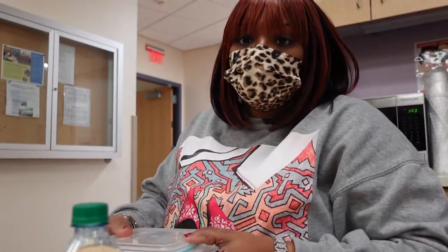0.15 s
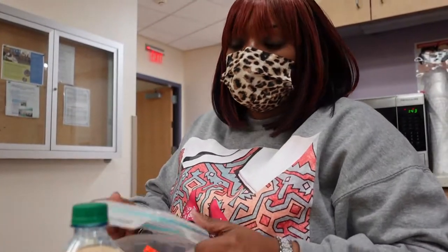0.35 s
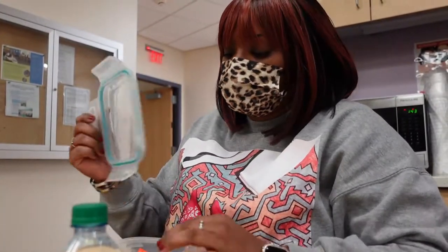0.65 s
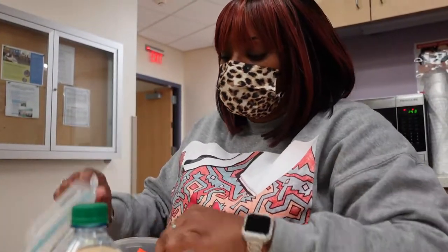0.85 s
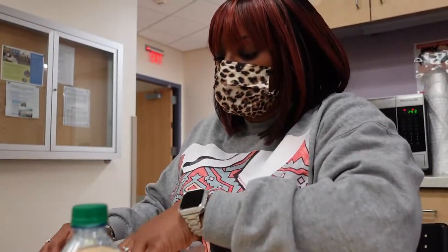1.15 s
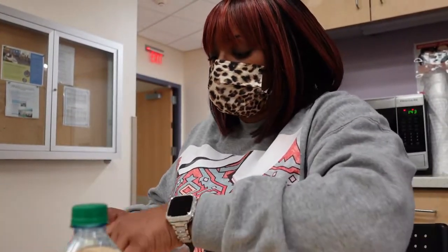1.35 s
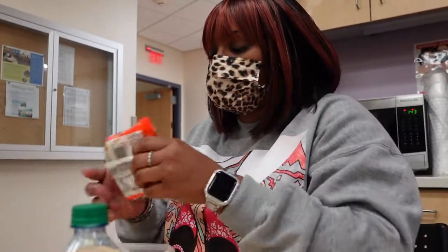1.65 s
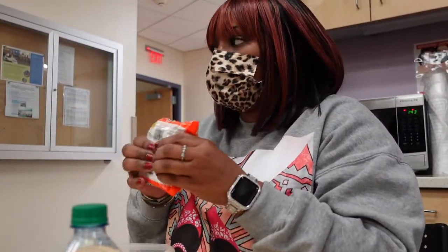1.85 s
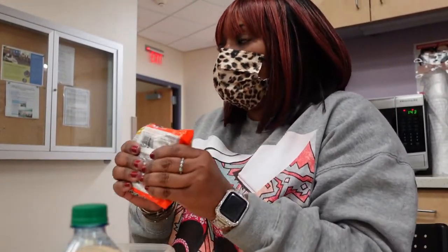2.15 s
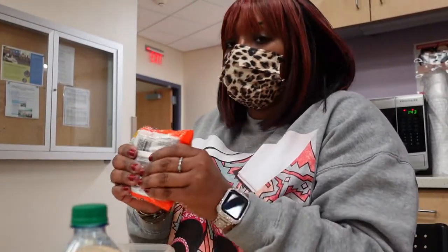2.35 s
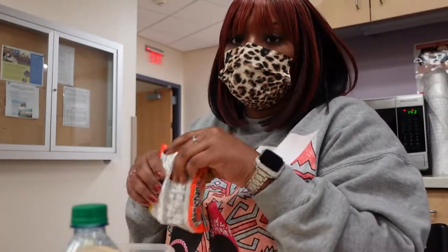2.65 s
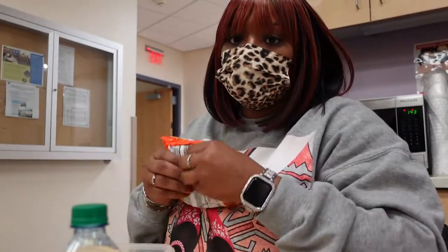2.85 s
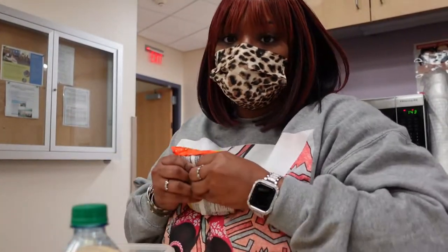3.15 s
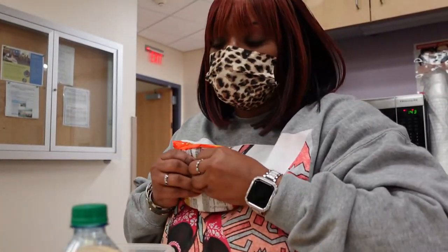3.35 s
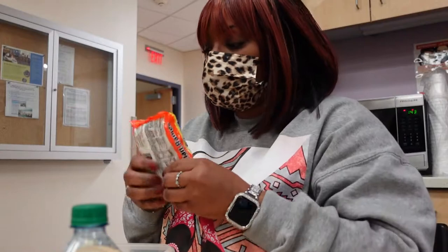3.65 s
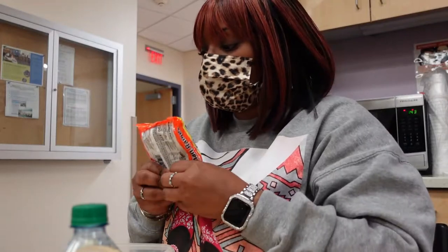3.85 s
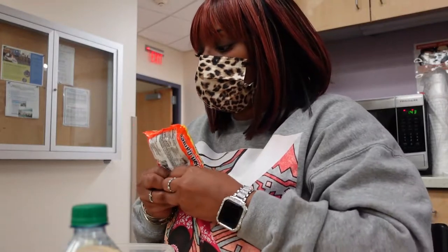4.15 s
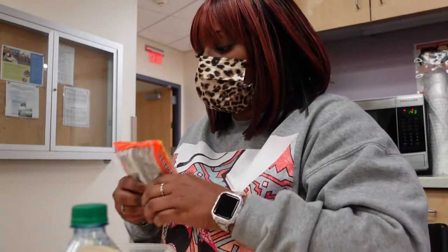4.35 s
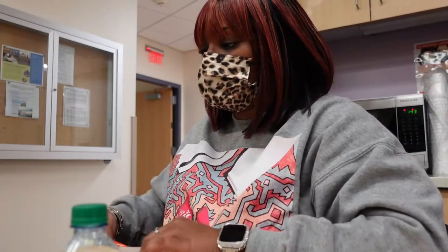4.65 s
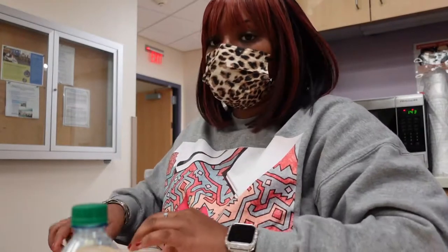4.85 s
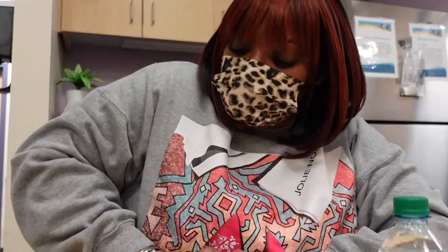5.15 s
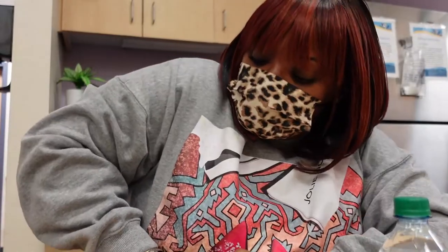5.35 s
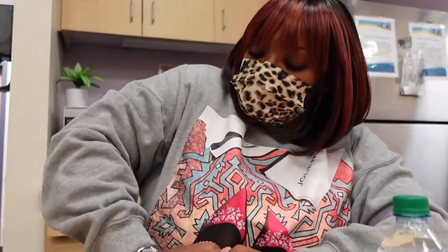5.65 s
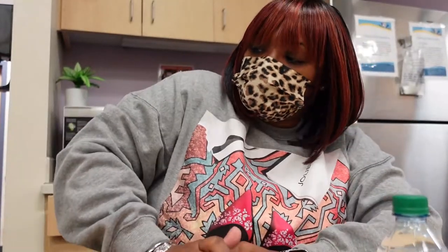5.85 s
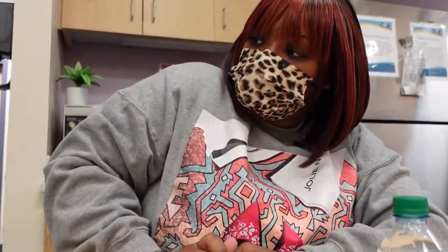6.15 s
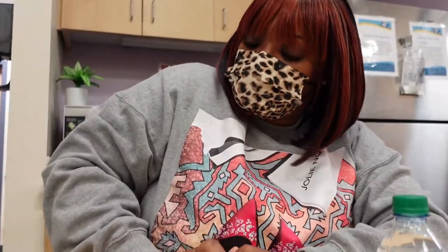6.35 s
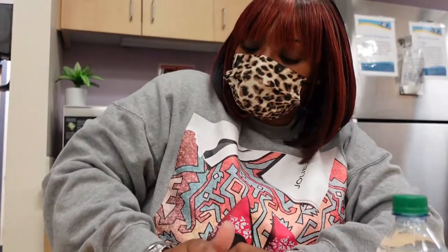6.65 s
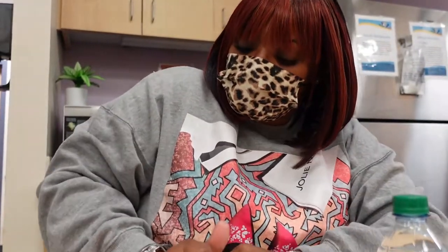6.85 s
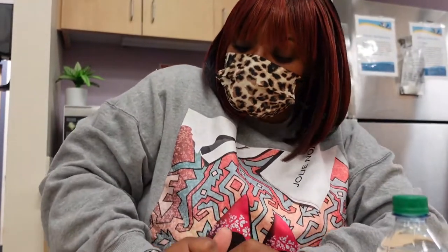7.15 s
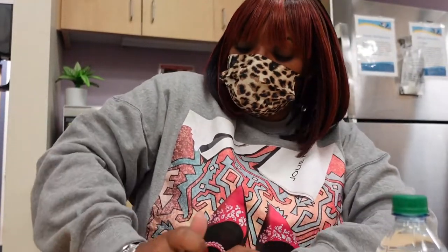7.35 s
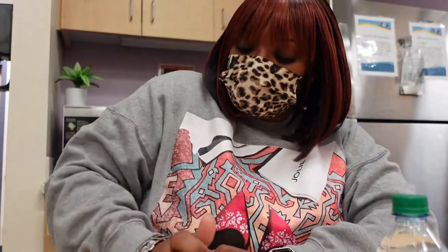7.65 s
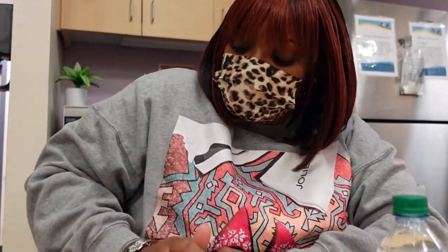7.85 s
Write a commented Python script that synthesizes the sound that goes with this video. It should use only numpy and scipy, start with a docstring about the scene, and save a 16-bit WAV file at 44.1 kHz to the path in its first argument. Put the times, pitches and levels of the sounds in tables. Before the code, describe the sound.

A nearby phone microphone catches a light plastic box being knocked and scraped, then nearly continuous crisp crinkling of a noodle packet in the hands, full of irregular clicks and snaps. After a brief lull the packet is crushed under a palm on the table: muffled rustles, heavy brittle cracks, soft wooden-sounding bumps and two tiny groans. The small room adds slight echoes and a quiet steady hum.

```python
"""In a small kitchen a plastic box lid is unclipped and laid down: rubs and knocks ring the box.
Then a packet of dry noodles is picked up, turned and squeezed: stiff film crinkles in clumped clicks,
noodles snap as short bursts of noise, and hard squeezes give dense cracks. At last it is crushed by
leaning on it on the table, which rings low in decaying sines and groans in three sagging overtones.
A phone stands close by; there are faint echoes of the room, over steady air and fridge noise."""
import sys
import numpy as np
from scipy import signal
from scipy.fft import rfft, irfft
from scipy.io import wavfile
from scipy.ndimage import uniform_filter1d

SR = 44100
rng = np.random.default_rng(int(sys.argv[2]) if len(sys.argv) > 2 else 0)


def boost_factor(decibels):
    """Convert a level in decibels to a linear amplitude factor."""
    exponent = np.asarray(decibels, float) / 20
    return 10 ** exponent


def dump(signal):
    """Clip the signal to [-1, 1] and save it as 16-bit WAV at the path in sys.argv[1]."""
    limited = np.clip(np.atleast_2d(signal).T, -1, 1)
    pcm = np.round(limited * 32767).astype(np.int16)
    wavfile.write(sys.argv[1], SR, pcm)


N = 352800  # samples, 8 s

LIFTED_S, PALM_DOWN_S = 1.3, 4.56  # packet leaves the table; palm covers it on the table


def evened(x):
    """Scales a sound to an rms of one."""
    return x / np.sqrt(np.mean(x ** 2) + 1e-20)


def read(points, hz):
    """Reads a table of (Hz, value) along a logarithmic frequency axis."""
    f, value = np.transpose(points)
    return np.interp(np.log(hz + 1), np.log(f + 1), value)


def band(x, lo_hz, hi_hz):
    """Keeps the sound between two frequencies."""
    sos = signal.butter(2, [lo_hz, min(hi_hz, 0.45 * SR)], "bandpass", fs=SR, output="sos")
    return signal.sosfilt(sos, x)


def causal(points, size=2048):
    """Impulse response with the given spectrum and the least delay."""
    gain_db = np.maximum(read(points, abs(np.fft.fftfreq(size, 1 / SR))), -100)
    log_gain = np.log(boost_factor(gain_db))
    minimum_phase = np.exp(np.conj(signal.hilbert(log_gain)))
    return np.fft.ifft(minimum_phase).real[:size // 2]


def ring(modes, detune=1, weight_db=0, rise_s=0.000084):
    """Sum of dying sines, neighbours in opposite sense, with the short rise of a soft blow."""
    hz, db, t60 = np.transpose(modes)
    t = np.arange(SR // 6)[:, None] / SR
    sines = (-1) ** np.arange(len(hz)) * np.sin(2 * np.pi * hz * detune * t)
    decay = boost_factor(db + weight_db - 60 * t / t60)
    return (decay * sines * (1 - np.exp(-t / rise_s))).sum(1)


def favour(modes, centre_hz, db_per_octave):
    """Modes far from the region that a blow excites ring weaker."""
    return -db_per_octave * abs(np.log2(np.array(modes)[:, 0] / centre_hz))


def clicks(per_s, spread_db, clump_db, cap):
    """Random clicks of random sign that come in clumps; a few are large."""
    drift = evened(uniform_filter1d(rng.standard_normal(N), size=600))
    chance = per_s * boost_factor(clump_db * drift) / SR
    draw, size, sign = rng.random(N), rng.exponential(1, N), rng.choice([-1., 1.], N)
    return sign * boost_factor(spread_db * np.minimum(size, cap)) * (draw < chance)


def add(mix, s, sound):
    """Lays a sound into the mix from the given second on."""
    part = mix[round(s * SR):][:len(sound)]
    part += sound[:len(part)]


def strokes(rows, rise_db_per_s, fall_db_per_s, rest_db):
    """Level of gestures that rise, slide from first to last dB and fall; last column of the loudest."""
    t = np.arange(0, N + 64, 32) / SR
    s, length, first_db, last_db, colour_db = np.transpose(rows)[:, :, None]
    level_db = first_db + (last_db - first_db) * np.clip((t - s) / length, 0, 1)
    level_db = level_db - rise_db_per_s * np.maximum(s - t, 0)
    level_db = level_db - fall_db_per_s * np.maximum(t - s - length, 0)
    colour_db = uniform_filter1d(colour_db[level_db.argmax(axis=0), 0], size=30)
    level_db = np.maximum(level_db.max(axis=0), rest_db)
    return [np.interp(np.arange(N) / SR, t, v) for v in (level_db, colour_db)]


# Squeezes of the packet. Each row: start in seconds, length in seconds, first level in dB,
# last level in dB, weight passed into packet and table in dB over the crinkle.
SQUEEZES = [(1.165, 0.2, -23.5, -33.5, -5), (1.34, 0.1, -31.5, -23.5, -5.5), (1.44, 0.16, -25.5, -36, -5.5),
            (1.735, 0.43, -29.5, -31, -13.5), (2.255, 0.032, -26, -26.5, -14.5),
            (2.31, 0.028, -23.5, -46, -23), (2.365, 0.06, -37.5, -28.5, -19),
            (2.41, 0.19, -28.5, -28, -15.5), (2.66, 0.49, -28.5, -33.5, -11), (3.247, 0.038, -41, -26, -19),
            (3.34, 0.13, -34, -24.5, -10), (3.565, 0.11, -26, -27, -15), (3.74, 0.29, -28.5, -39, -14),
            (4.102, 0.015, -37, -26.5, -21), (4.29, 0.16, -32, -30.5, -15), (4.567, 0.099, -33.5, -28, -13),
            (4.72, 0.093, -35, -32, -5), (5.1, 0.252, -36.5, -35, -6), (5.46, 0.27, -31.5, -37.5, -8.5),
            (5.72, 0.063, -35.5, -30.5, -7.5), (6.099, 0.19, -33.5, -36.5, -4.5),
            (6.4, 0.037, -42.5, -38.5, -2), (6.45, 0.095, -35.5, -26.5, -11.5),
            (6.55, 0.12, -33.5, -32.5, -12), (6.86, 0.15, -29.5, -33, -12.5), (7.16, 0.15, -34, -30.5, -8),
            (7.407, 0.19, -28.5, -35, -11.5), (7.61, 0.24, -37, -34.5, -8), (7.93, 0.1, -39, -35.5, -11)]
GRIP_RISE_DB_PER_S, GRIP_FALL_DB_PER_S = 358, 201
HELD_DB = -46.5  # between squeezes the packet is merely held
# treble of the crinkle in dB, before the strength of the squeeze shifts it
BRIGHT_AT_PICKUP_DB, BRIGHT_IN_HAND_DB, BRIGHT_UNDER_PALM_DB = -25, -6.5, -14.5
BRIGHT_PER_DB = -0.12  # negative: louder squeezes have less treble in proportion


def grip():
    """Crinkle level, brightness and weight of the hands, fading in steeply as they reach the packet."""
    t = np.arange(N) / SR
    level_db, weight_db = strokes(SQUEEZES, GRIP_RISE_DB_PER_S, GRIP_FALL_DB_PER_S, HELD_DB)
    first_s, first_db = SQUEEZES[0][0], SQUEEZES[0][2]
    places = [t < LIFTED_S, t < PALM_DOWN_S]
    bright_db = np.select(places, [BRIGHT_AT_PICKUP_DB, BRIGHT_IN_HAND_DB], BRIGHT_UNDER_PALM_DB)
    bright_db = uniform_filter1d(bright_db, size=4000) + BRIGHT_PER_DB * (level_db - first_db)
    level_db = level_db - GRIP_RISE_DB_PER_S * np.maximum(first_s - t, 0)
    return level_db, bright_db, weight_db


# Colour of a film click. Each row: frequency in Hz, relative level in dB per Hz.
FILM = [(180, -3), (300, -4), (565, 14), (930, 9), (1120, 12), (2140, 14), (7570, 6.5), (14200, -3),
        (16000, -10)]
POPS_PER_S, BUSIER_PER_DB, FIRM_DB = 600, 0.5, -33.5  # mean rate at a firm grip, before clumping
AIR_DB, AIR_PER_BRIGHT = -4.5, 0.34  # the highest treble follows the brightness only in part


def crinkle(count=48):
    """Film facets of many sizes pop over, each a click with its own brief colour; pressure thuds below."""
    level_db, bright_db, weight_db = grip()
    # facets pop more often above a firm grip, seldom below
    busier = boost_factor(BUSIER_PER_DB * (np.maximum(level_db, HELD_DB) - FIRM_DB))
    pops = clicks(per_s=POPS_PER_S * busier, spread_db=2.0, clump_db=3, cap=3.3) / np.sqrt(busier)
    # each fold has its own colour
    drift = uniform_filter1d(rng.standard_normal(N), size=2000)
    fold = evened(uniform_filter1d(drift, size=2000))
    place = np.clip(0.5 + 0.25 * fold + 0.15 * rng.standard_normal(N), 0, 0.99)
    facet = (count * place).astype(int)
    film = np.zeros(N)
    for k, hz in enumerate(np.geomspace(2000, 9000, count)):
        flutter = rng.standard_normal(200) * boost_factor(-60 * np.arange(200) / SR / 0.011)
        flutter[0] += 1.5
        click = evened(flutter) + 0.9 * evened(band(flutter, 0.75 * hz, 1.6 * hz))
        at = np.flatnonzero(pops * (facet == k))
        spots = (at[:, None] + np.arange(200)) % N
        film += np.bincount(spots.ravel(), np.outer(pops[at], click).ravel(), N)
    film = signal.oaconvolve(film, causal(FILM))[:N]
    middle = evened(band(film, 700, 5000))
    top = boost_factor(bright_db) * evened(band(film, 5000, 9000))
    air = boost_factor(AIR_DB + AIR_PER_BRIGHT * bright_db) * evened(band(film, 9000, 18000))
    paper = evened(band(pops, 300, 900))
    thud = paper + 0.26 * evened(signal.oaconvolve(pops, ring(TABLE))[:N])
    # signs join the bands without gaps
    return boost_factor(level_db) * (middle - top + air - boost_factor(weight_db) * evened(thud))


SMALL_SNAPS, SMALL_HZ = 520, (1600, 7700)  # count; range of centres
SMALL_OVER_DB, SMALL_SPREAD_DB = 9.5, 3.5  # least size over the crinkle level, about; random spread
SMALL_T60_S = (0.0018, 0.0068)  # the highest small snaps are shortest


def small_snaps():
    """Rows of small snaps at random moments, sized by the grip."""
    when, size, pitch = rng.random((SMALL_SNAPS, 3)).T
    s = LIFTED_S + when * (N / SR - LIFTED_S)
    level_db = grip()[0][(s * SR).astype(int)]
    db = level_db + SMALL_OVER_DB - SMALL_SPREAD_DB * np.log(np.maximum(size, 0.05))
    t60 = SMALL_T60_S[1] + (SMALL_T60_S[0] - SMALL_T60_S[1]) * pitch
    hz = SMALL_HZ[0] * (SMALL_HZ[1] / SMALL_HZ[0]) ** pitch
    return list(zip(s, db, hz, t60))


# Single snaps of film and noodles, loud and quiet. Each row: start in seconds, peak in dB before
# the bass is taken off, centre in Hz, time to die by 60 dB in seconds.
SNAPS = [(1.224, -2.5, 1370, 0.0028), (1.285, -9, 825, 0.0034), (1.3445, -16, 910, 0.016),
         (1.4163, -12, 3430, 0.01), (1.493, -15, 3180, 0.012), (1.565, -15, 3700, 0.0089),
         (1.666, -12, 3450, 0.0034), (1.723, -16, 5470, 0.007), (1.7346, -10, 3240, 0.016),
         (1.742, -6, 3000, 0.027), (1.758, -8.5, 2360, 0.036), (1.8192, -20, 1940, 0.008),
         (1.8517, -10, 2570, 0.008), (1.8952, -6.5, 6100, 0.0092), (1.9188, -9.5, 2440, 0.0055),
         (1.952, -8, 5270, 0.011), (1.9882, -5, 2150, 0.0048), (2.006, -8, 2720, 0.0081),
         (2.0255, -5.5, 2980, 0.01), (2.06, -11, 2770, 0.0091), (2.1218, -3, 6200, 0.0037),
         (2.147, -9, 5700, 0.005), (2.16, -13, 4780, 0.006), (2.176, -10.5, 3990, 0.0075),
         (2.2277, -2.5, 2070, 0.0028), (2.247, 5, 6800, 0.01), (2.309, -5.5, 2130, 0.01),
         (2.366, -24, 2000, 0.0051), (2.376, -21, 2100, 0.008), (2.3853, -15, 1860, 0.0076),
         (2.395, -8.5, 3040, 0.005), (2.402, -17, 2700, 0.005), (2.4086, -8, 2640, 0.0065),
         (2.417, -18, 6000, 0.005), (2.425, -18, 5500, 0.0072), (2.446, -29, 4170, 0.006),
         (2.517, -7, 6560, 0.0061), (2.5345, -8.5, 2040, 0.006), (2.5684, -7, 2560, 0.0058),
         (2.6664, -6.5, 4700, 0.0086), (2.677, -4, 2900, 0.0039), (2.707, -11, 3330, 0.0042),
         (2.732, -6.5, 3050, 0.011), (2.7436, -7, 2560, 0.0038), (2.7664, -14, 3810, 0.0081),
         (2.802, -6.5, 5500, 0.011), (2.8129, -5, 3630, 0.0037), (2.831, -8, 2920, 0.0082),
         (2.8662, -5.5, 3400, 0.0076), (2.892, -8.5, 3470, 0.014), (2.914, -10.5, 2300, 0.0089),
         (2.919, -9.5, 3000, 0.0056), (2.938, -13, 4840, 0.0095), (2.946, -17, 8000, 0.006),
         (2.9777, -9.5, 2850, 0.026), (2.986, -15, 5500, 0.0093), (2.9999, -8, 2670, 0.006),
         (3.0318, -6.5, 4940, 0.027), (3.0755, -9, 6000, 0.0033), (3.084, -16, 4250, 0.0052),
         (3.103, 0.5, 2220, 0.011), (3.1275, -10, 4530, 0.0024), (3.135, -10.5, 2960, 0.0049),
         (3.2167, -22, 5430, 0.012), (3.244, -8, 6510, 0.0083), (3.2487, 0.5, 3580, 0.004),
         (3.255, -1.5, 3630, 0.022), (3.2704, -1, 4700, 0.008), (3.2733, -6, 1460, 0.0071),
         (3.285, -2.5, 1740, 0.009), (3.3046, 0.5, 1610, 0.0057), (3.42, -8, 3000, 0.0058),
         (3.4788, -7.5, 3870, 0.021), (3.528, -14.5, 2240, 0.0055), (3.5425, -24, 2220, 0.0081),
         (3.562, -24, 2390, 0.0059), (3.574, -22, 2000, 0.015), (3.6145, -9.5, 2250, 0.024),
         (3.669, -15, 3260, 0.019), (3.7325, -5, 6000, 0.0057), (3.795, -2, 2300, 0.0072),
         (3.8278, -3, 2370, 0.0047), (3.891, -10.5, 2480, 0.01), (3.9387, -7.5, 2620, 0.0058),
         (3.9696, -9, 4530, 0.0066), (3.994, -15, 3170, 0.011), (4.0884, -15.5, 1820, 0.0053),
         (4.105, 2, 5350, 0.015), (4.241, -20, 2910, 0.011), (4.258, -12.5, 2300, 0.0094),
         (4.348, -9.5, 4850, 0.012), (4.569, -8.5, 3690, 0.017), (4.5996, -6.5, 1470, 0.0094),
         (4.6367, -0.5, 1120, 0.018), (4.6678, -17, 1380, 0.0063), (4.891, -25, 2440, 0.0057),
         (4.966, -41, 2500, 0.005), (4.9997, -29, 3800, 0.0035), (5.03, -16.5, 1760, 0.0075),
         (5.041, -15, 1000, 0.016), (5.1115, -8, 1310, 0.011), (5.1352, 1.5, 1500, 0.016),
         (5.175, -7.5, 4200, 0.0046), (5.182, -23, 2980, 0.006), (5.24, -11.5, 2930, 0.0091),
         (5.275, -14.5, 1310, 0.014), (5.296, -15, 2780, 0.0056), (5.315, -21, 8960, 0.0088),
         (5.3593, -12, 2730, 0.01), (5.3789, -15, 866, 0.015), (5.419, -10, 2700, 0.0091),
         (5.434, -20, 2880, 0.015), (5.4608, -1, 1250, 0.027), (5.5258, -10, 3120, 0.015),
         (5.554, -11.5, 1440, 0.012), (5.576, -16, 3300, 0.0091), (5.605, -12, 2810, 0.0037),
         (5.7736, -16.5, 2230, 0.012), (5.845, -11, 4000, 0.0059), (5.9192, -23, 820, 0.0081),
         (6.009, -17.5, 3200, 0.021), (6.0652, -18.5, 1880, 0.024), (6.102, 0.5, 3300, 0.0056),
         (6.1127, -5, 2310, 0.0072), (6.124, -1.5, 3960, 0.0064), (6.145, 5, 3130, 0.0079),
         (6.1937, -3.5, 1230, 0.0051), (6.245, -13, 1150, 0.021), (6.28, -19, 2760, 0.017),
         (6.307, -17.5, 2390, 0.0096), (6.4056, -21, 2250, 0.0061), (6.427, -14, 2290, 0.0087),
         (6.4532, -6.5, 2440, 0.01), (6.501, -8, 2120, 0.0068), (6.528, -10, 2340, 0.0059),
         (6.562, -10, 2900, 0.0061), (6.6638, -19, 1330, 0.022), (6.7398, -15.5, 2760, 0.0076),
         (6.7538, -18, 1600, 0.0031), (6.769, -12, 1600, 0.0084), (6.8661, -8, 3530, 0.012),
         (6.9032, -1, 1500, 0.021), (6.927, -13, 2500, 0.0058), (6.937, -7.5, 1350, 0.012),
         (6.948, -8, 2670, 0.0055), (6.953, -19, 3480, 0.0029), (6.959, 5.5, 910, 0.0081),
         (6.999, -4.5, 2940, 0.0022), (7.0705, -14, 1280, 0.0075), (7.1708, -13.5, 2200, 0.0085),
         (7.207, -16, 2120, 0.0073), (7.275, -10.5, 2540, 0.0055), (7.313, -12, 2080, 0.0056),
         (7.385, -19, 3180, 0.0071), (7.407, -8.5, 1550, 0.013), (7.4128, 3.5, 2920, 0.0031),
         (7.467, -16, 2920, 0.0078), (7.528, -8.5, 3260, 0.0088), (7.5648, -8.5, 2770, 0.014),
         (7.6034, -11, 1020, 0.011), (7.6675, -13, 1120, 0.009), (7.735, -17, 2530, 0.007),
         (7.824, -9, 3280, 0.004), (7.9143, -22, 2890, 0.007), (7.9379, -17.5, 1190, 0.012)]


def snaps():
    """A burst of noise in the colour of the film, strongest round its own centre."""
    out, colour, t = np.zeros(N), causal(FILM), np.arange(1600) / SR
    rows = small_snaps() + list(SNAPS)
    for (s, db, hz, t60), noise in zip(rows, rng.standard_normal((len(rows), 1600))):
        burst = noise * boost_factor(-60 * t / t60) * np.minimum(t / (0.083 * t60), 1)
        burst[8] += 0.45 * np.sign(noise[0])  # the crease gives way with one sharp step
        wide = signal.fftconvolve(burst, colour)[:len(t)]
        wide = band(wide, 0.29 * hz, 4 * hz) + 0.39 * wide  # deep snaps are duller, high ones thinner
        snap = evened(wide) + 0.5 * evened(band(burst, 0.7 * hz, 1.45 * hz))
        if s > PALM_DOWN_S:  # the palm muffles the middle treble
            snap = snap - 0.49 * band(snap, 4130, 7400)
        add(out, s, boost_factor(db) * snap / abs(snap).max())
    return band(out, 250, 19000)  # thin film radiates no bass


# Hard squeezes in which the noodle block gives way all at once. Each row: start in seconds,
# length in seconds, level in dB before the fade.
CRUNCHES = [(1.17, 0.085, -28.5), (2.68, 0.04, -29), (3.242, 0.076, -22.5), (4.121, 0.018, -24),
            (4.562, 0.029, -19), (4.623, 0.11, -29), (4.798, 0.04, -27.5), (5.457, 0.018, -12.5),
            (6.097, 0.026, -17), (6.13, 0.087, -13.5), (6.938, 0.1, -18), (7.598, 0.026, -14)]


def crunches():
    """Many noodles break at once: dense cracks that start at once and ease off, duller than the film."""
    strength = np.zeros(N)
    for s, length, db in CRUNCHES:
        u = np.linspace(0, 1, round(length * SR))
        add(strength, s, boost_factor(db) * np.minimum(u * length / 0.0083, 1) * (1 - u ** 2.0))
    cracks = clicks(per_s=1300, spread_db=7.0, clump_db=4.0, cap=1.9)
    dull, sharp = evened(band(cracks, 456, 4250)), evened(band(cracks, 6700, 13000))
    return strength * evened(dull - 0.14 * sharp)


# Modes of the plastic box. Each row: frequency in Hz, relative level in dB,
# time to die by 60 dB in seconds.
BOX = [(188, -15.5, 0.27), (275.7, 3, 0.14), (496, 11, 0.04), (722, 6.5, 0.016), (878, 0.5, 0.046),
       (1016, 0, 0.028), (1310, 5, 0.016), (1500, 5, 0.026), (2040, 6.5, 0.01), (2670, -1.5, 0.022),
       (3280, -3, 0.017)]
# Blows on the box. Each row: start in seconds, peak of the ring in dB before the last filter,
# peak of the sharp crack in dB over the ring, weight of the low modes in dB, loudest region in Hz.
KNOCKS = [(0.036, -21, -22, -13, 870), (0.05, -17, -15, -12, 605), (0.08, -1.5, -4, -6.5, 662),
          (0.093, -8.5, 10, -25, 665), (0.276, -15.5, -11, -4, 1310), (0.328, -15, -13, -2, 638),
          (0.361, -12, -15, -3, 1310), (0.37, -11.5, -17, -6, 746), (0.411, 2.5, -6.5, -9.5, 611),
          (0.489, -19, -5, -25, 708), (0.527, -10, 5, -39, 760), (0.799, -20.5, -7.5, -13.5, 784),
          (0.923, -13, 4.5, -16, 651), (0.95, -3, -3.5, -9, 815), (0.987, -4, -15, -16, 1020),
          (1.021, -3, -7, -17, 930), (1.037, -1, -9, -9, 910), (1.042, -12, 1, -29, 870),
          (1.067, -15.5, -4, -9, 883), (1.1, -8.5, -12, -25, 890), (1.113, -4, -5.5, -17, 2050),
          (1.15, -1.5, -8, -14, 1390), (1.178, -5, -13, -35, 1870), (1.185, -4, -12, -22, 2080),
          (1.191, -4, -14, -16, 1720)]


def knocks():
    """Each blow lands on another spot, so the box modes ring in new shares, under a short crack."""
    out, low = np.zeros(N), np.array(BOX)[:, 0] < 600
    spots = rng.standard_normal((len(KNOCKS), len(BOX)))
    cracks = rng.standard_normal((len(KNOCKS), 800))
    for (s, db, crack_db, boom_db, hz), spot, crack in zip(KNOCKS, spots, cracks):
        weight_db = np.where(low, boom_db, favour(BOX, hz, 6.5) + 2.4 * spot[::-1])
        blow = ring(BOX, 1 + 0.027 * spot, weight_db)
        blow /= abs(blow).max()
        crack = 0.31 * crack * boost_factor(-60 * np.arange(800) / SR / 0.014)
        crack[0] = 2  # one hard step, then a little splinter noise
        crack = band(crack, 1200, 5200)
        add(blow, 0, boost_factor(crack_db) * crack / abs(crack).max())
        add(out, s, boost_factor(db) * blow)
    return band(out, 150, 18000)  # a small box radiates no deep bass


# Strokes of the lid over the rim of the box. Each row: start in seconds, length in seconds,
# first level of the ring in dB, last level of the ring in dB, hiss in dB over the ring.
RUBS = [(0.0, 0.058, -45.5, -57, 7.5), (0.082, 0.059, -24.5, -19, -6.5), (0.13, 0.25, -32, -43, -6),
        (0.34, 0.14, -51, -32.5, -6), (0.535, 0.06, -64, -68, 5), (0.96, 0.17, -28.5, -38.5, -5.5),
        (1.15, 0.18, -34.5, -45.5, 10)]
RUB_RISE_DB_PER_S, RUB_FALL_DB_PER_S = 2498, 352
UNCLIPPED_S = 0.26  # the seal peels off with a high hiss until here


def rub():
    """Dense slips along the rim feed the box modes and a hiss that peaks in the low treble."""
    level_db, hiss_db = strokes(RUBS, RUB_RISE_DB_PER_S, RUB_FALL_DB_PER_S, -200)
    slips = clicks(per_s=4000, spread_db=3.0, clump_db=1.5, cap=11.0)
    body = evened(signal.oaconvolve(slips, ring(BOX))[:N]) + 9.1 * evened(band(slips, 190, 690))
    peeling = np.arange(N) < UNCLIPPED_S * SR
    squeal = 0.6 * peeling * evened(band(slips, 4500, 6100))
    hiss = evened(band(slips, 1050, 3950)) + squeal
    return boost_factor(level_db) * (evened(body) - boost_factor(hiss_db) * evened(hiss))


# Modes of the table top. Each row: frequency in Hz, relative level in dB,
# time to die by 60 dB in seconds.
TABLE = [(127.7, -3.5, 0.28), (178, 6.5, 0.11), (229, 4.5, 0.096), (293, 2.5, 0.18), (351, 11, 0.032),
         (460, 4.5, 0.068), (627, -5.5, 0.17), (850, -5.5, 0.25), (1145, 20, 0.032)]
# Palm and packet bumping the table. Each row: start in seconds, peak in dB,
# loudest region in Hz, ring time as a factor.
BUMPS = [(4.601, -27.5, 380, 0.78), (4.636, -21, 610, 0.97), (4.651, -26, 293, 0.92),
         (4.813, -27.5, 580, 0.69), (5.0508, -14.5, 507, 0.22), (5.111, -29, 188, 0.4),
         (5.135, -25, 300, 0.17), (5.405, -29, 453, 1.0), (5.462, -8, 780, 0.49), (5.493, -26, 290, 1.0),
         (5.739, -22.5, 586, 0.24), (6.11, -26, 456, 0.9), (6.14, -20.5, 224, 0.83),
         (6.165, -12.5, 800, 0.71), (6.206, -25.5, 178, 0.83), (6.905, -21, 650, 0.48),
         (6.937, -21.5, 200, 0.57), (7.14, -35, 424, 0.34), (6.964, -15, 460, 1), (7.003, -21.5, 357, 0.76),
         (7.036, -27.5, 293, 0.69), (7.604, -11, 750, 1), (7.667, -17, 580, 0.14), (7.685, -20, 293, 0.41),
         (7.785, -27.5, 288, 1.0), (7.936, -35, 197, 1.0)]


def bumps():
    """Soft blows on the table top, which rings low and briefly; a resting hand damps it."""
    out = np.zeros(N)
    spots = rng.standard_normal((len(BUMPS), len(TABLE)))
    for (s, db, hz, ring_factor), spot in zip(BUMPS, spots):
        modes = np.array(TABLE) * [1, 1, ring_factor]
        bump = ring(modes, 1 + 0.035 * spot, favour(TABLE, hz, 10.1), rise_s=0.0016)
        # a soft hand cannot wake the modes far above its region
        bump = signal.sosfilt(signal.butter(4, 1.52 * hz, fs=SR, output="sos"), bump)
        add(out, s, boost_factor(db) * bump / abs(bump).max())
    return out


# The table groans briefly as weight comes on it. Each row: start in seconds, length in seconds,
# level in dB before the swell, first pitch in Hz, last pitch in Hz, tilt in dB per overtone.
GROANS = [(5.058, 0.038, -36, 192.7, 188, 0), (5.152, 0.042, -26, 200, 160, -3)]


def groans():
    """A joint slips in a quick regular stutter: three overtones whose pitch sags."""
    out = np.zeros(N)
    for s, length, db, first_hz, last_hz, tilt_db in GROANS:
        u = np.linspace(0, 1, round(length * SR))
        turns = np.cumsum(first_hz + (last_hz - first_hz) * u) / SR
        tone = sum(boost_factor(tilt_db * k) * np.cos(2 * np.pi * (k + 1) * turns) for k in range(3))
        swell = np.sin(np.pi * u ** 0.55) ** 0.75
        add(out, s, boost_factor(db) * evened(tone) * swell)
    return out


# Echoes of the room. Each row: frequency in Hz, time to die by 60 dB in seconds.
KITCHEN = [(200, 0.36), (1000, 0.35), (4000, 0.27), (12000, 0.08)]


def kitchen(x, count=3):
    """Sparse echoes, each band dying at its own speed; the sound passes in turn through several patterns."""
    taps = np.zeros((2 * count, SR // 2))
    slots = np.arange(120, SR // 2 - 20, 20)
    at = slots + rng.integers(0, 20, (2 * count, len(slots)))
    np.put_along_axis(taps, at, rng.choice([-1., 1.], at.shape), 1)
    hz, t, z = signal.stft(taps, SR, nperseg=256)
    tail = signal.istft(z * boost_factor(-60 * t / read(KITCHEN, hz)[:, None]), SR, nperseg=256)[1]
    tail = tail.reshape(2, count, -1) / np.linalg.norm(tail[0])
    # a fixed cycle of 3.1 Hz, so that no single tail imprints steady lines
    phase = 3.1 * np.arange(N) / SR + np.arange(count)[:, None] / count
    turn = np.cos(2 * np.pi * phase) * np.sqrt(2 / count)
    wet = signal.oaconvolve((x * turn)[None], tail, axes=2)
    return wet.sum(1)[:, :N]


# Colour of air and fridge. Each row: frequency in Hz, relative level in dB per Hz.
HUM = [(18, -30), (30, -27), (71, -8), (184, -5.5), (227, -4), (273, -6), (374, -8.5), (499, -14.5),
       (1460, -11), (6000, -25), (11600, -31), (16000, -48)]
HUM_DB = -50  # rms over both sides


def hum():
    """Steady air and machine noise, mostly alike on both sides."""
    hz = np.fft.rfftfreq(N, 1 / SR)
    common, left, right = irfft(rfft(rng.standard_normal((3, N))) * boost_factor(read(HUM, hz)), N)
    return boost_factor(HUM_DB) * evened(common + 0.51 * np.array([left, right]))


# Colour of the side signal at the phone. Each row: frequency in Hz, filter gain in dB.
SIDE_DB = [(60, -34), (120, -15), (240, -13.5), (480, -13), (950, -14), (1890, -24.5), (3770, -17.5),
           (7520, -10.5), (15000, -16.5)]


def scene():
    """Two close microphone ports: room in the middle; a faint side, its near part a quarter turn off."""
    near = knocks() + rub() + crinkle() + crunches() + snaps() + bumps() + groans()
    wet, other = kitchen(near)
    mid = near + boost_factor(-13.5) * wet
    quarter_turn = signal.hilbert(near).imag
    side = signal.oaconvolve(0.41 * quarter_turn + 0.32 * other, causal(SIDE_DB))[:N]
    return np.array([mid + side, mid - side]) + hum()


def roll_off(x):
    """The treble ends steeply here."""
    return signal.sosfilt(signal.butter(12, 16840, fs=SR, output="sos"), x)


def record(dry):
    """Loud peaks round off softly; the deep bass and top treble are dropped."""
    rounded = 0.75 * np.tanh(dry / 0.75)
    thin = signal.sosfilt(signal.butter(3, 65, "highpass", fs=SR, output="sos"), rounded)
    thin = signal.oaconvolve(thin, signal.firwin(255, 16100, fs=SR)[None], "same")
    return roll_off(thin)


dry = scene()
out = record(dry)
dump(out)
```